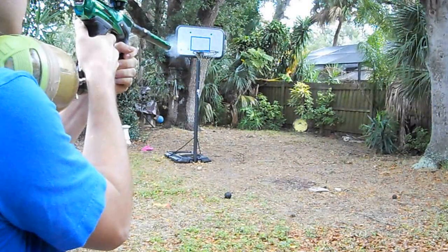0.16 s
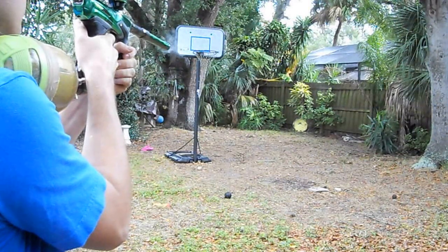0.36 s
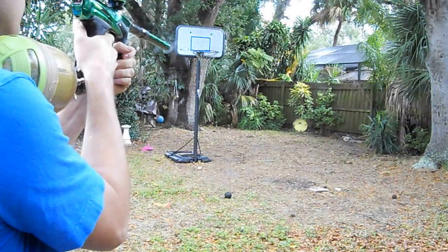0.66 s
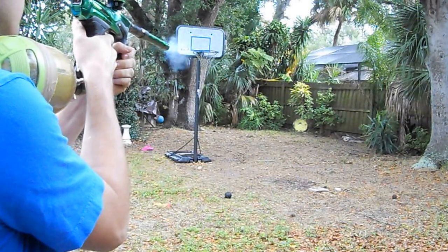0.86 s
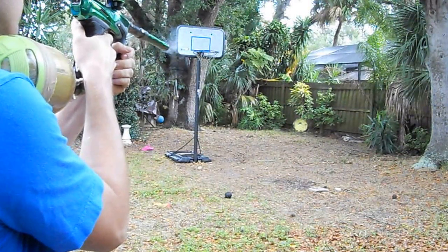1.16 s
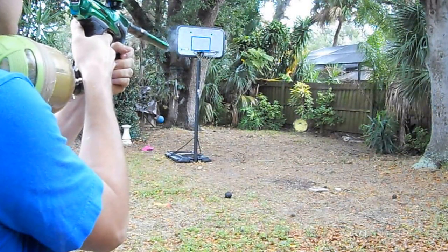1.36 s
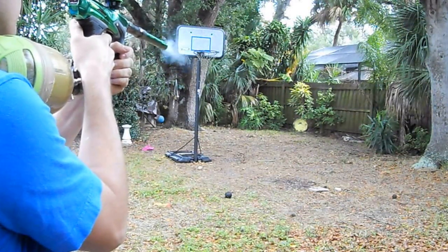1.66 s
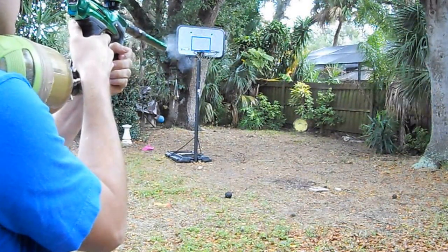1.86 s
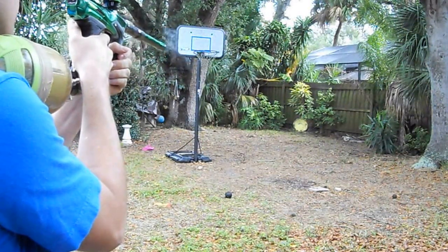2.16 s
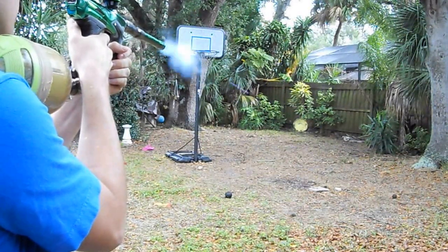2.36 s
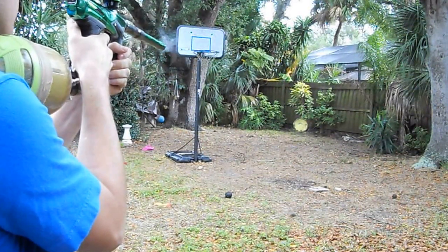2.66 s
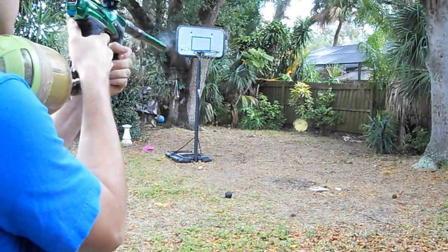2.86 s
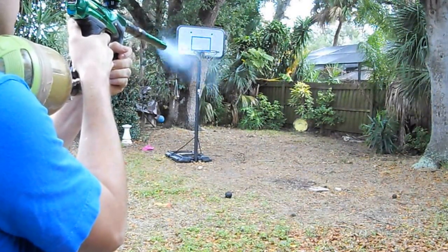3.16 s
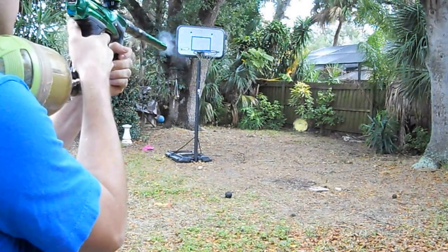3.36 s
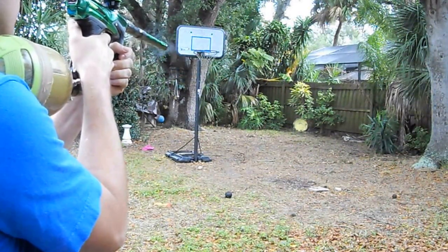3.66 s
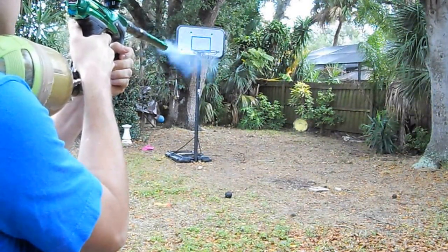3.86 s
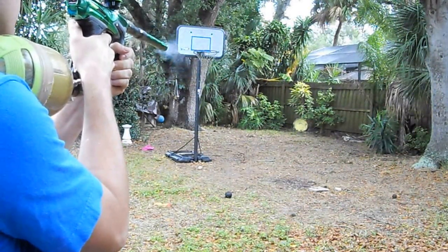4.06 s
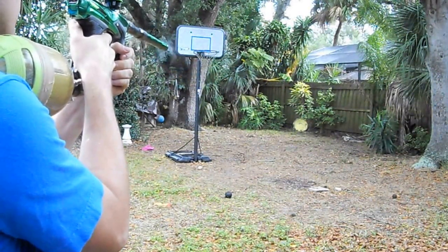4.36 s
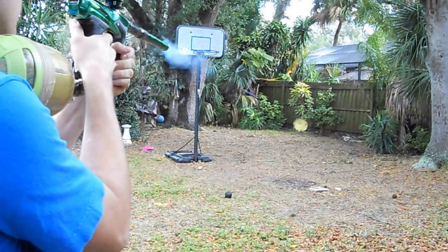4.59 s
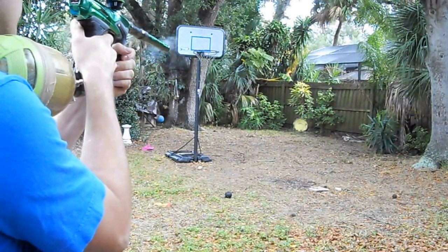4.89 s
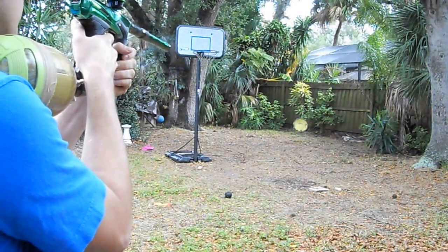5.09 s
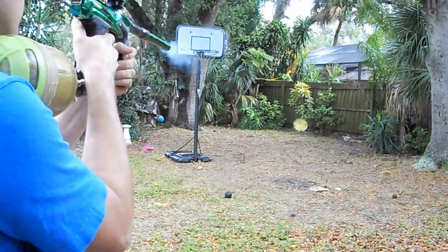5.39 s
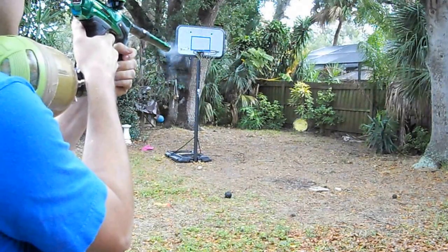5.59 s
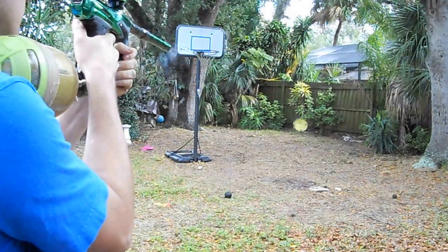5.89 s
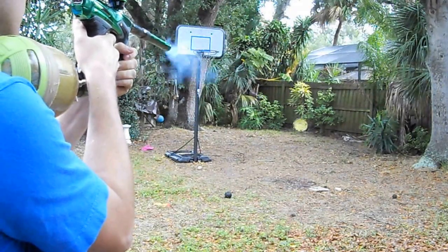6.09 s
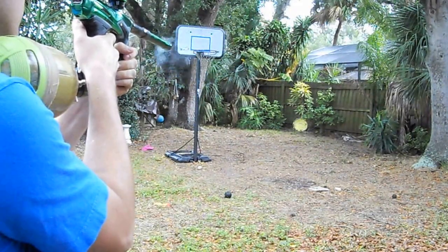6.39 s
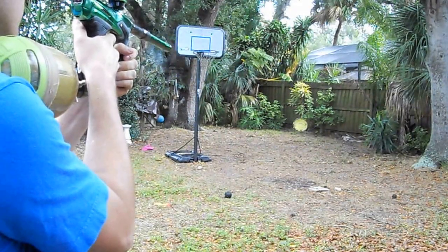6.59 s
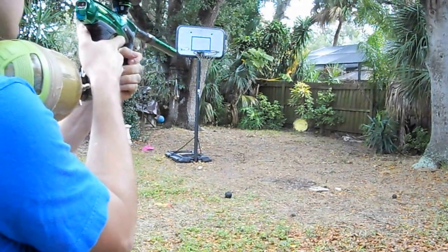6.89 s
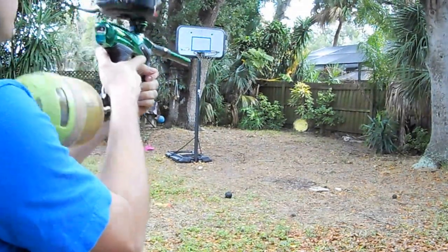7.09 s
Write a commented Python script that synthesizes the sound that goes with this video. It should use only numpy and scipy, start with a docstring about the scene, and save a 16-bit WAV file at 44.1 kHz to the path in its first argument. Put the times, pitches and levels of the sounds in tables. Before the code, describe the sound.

An outdoor yard sounds fairly loud until the first shot abruptly ducks the background. A nearby paintball marker then fires loud, slightly clipped pops, three spaced singles followed by fast doubles and a final triple. Mechanical clicks and gas bursts are close and dry; delayed splats and short dull metallic rings come from far off. Fence and trees scatter the echoes over soft leaf hiss and faint rumble.

```python
"""Paintball shots in a backyard

A paintball marker fires single shots and quick strings close by in a fenced yard, with leaves, far
traffic, a bird and dull knocks behind it. Clicks, squeals and thumps are sums of dying tones; gas and
scrapes are shaped noise. About 0.3 s after nearly every shot a ball bursts on a distant target that rings.
Fence, house, ground and trees throw sound back. A gain control keeps the yard loud until the first
shot pushes it down."""
import sys
import numpy as np
from scipy import signal
from scipy.fft import rfft, irfft
from scipy.io import wavfile
from scipy.ndimage import uniform_filter1d

SR = 44100
rng = np.random.default_rng(int(sys.argv[2]) if len(sys.argv) > 2 else 0)


def wav_record(signal):
    """Record a signal, one row per channel, as 16-bit PCM in the file named by sys.argv[1]."""
    frames = np.transpose(np.atleast_2d(signal))
    bounded = np.clip(frames, -1, 1)
    # unit amplitude maps onto the largest positive 16-bit level
    quanta = np.round(bounded * 32767).astype(np.int16)
    wavfile.write(sys.argv[1], SR, quanta)


N = 319380  # length of the scene in samples
T = np.arange(int(.45 * SR)) / SR  # the time axis of one short sound, in s


def amp(db):
    """Turns decibels into a gain."""
    return 10 ** (np.asarray(db) / 20)


def read(points, hz):
    """Reads a curve whose points are joined by straight lines on a log-frequency axis."""
    f, value = np.transpose(points)
    return np.interp(np.log(hz + 1), np.log(f + 1), value)


def add(mix, s, sound):
    """Mixes a sound in at time s."""
    part = mix[max(round(s * SR), 0):][:len(sound)]
    part += sound[:len(part)]


def cut(x, kind, hz, order):
    """A gentle high-pass or low-pass filter."""
    return signal.sosfilt(signal.butter(order, hz, kind, fs=SR, output="sos"), x)


def noise(colour, size):
    """Random noise shaped to a spectrum and brought to an rms of 1."""
    spectrum = rfft(rng.standard_normal(size))
    x = irfft(spectrum * amp(read(colour, np.fft.rfftfreq(size, 1 / SR))), size)
    return x / x.std()


def puff(colour, db, rise, t60):
    """A burst of noise that swells over about `rise` s and dies by 60 dB in `t60` s."""
    return noise(colour, len(T)) * amp(db - 60 * T / t60) * (1 - np.exp(-T / rise))


def ring(modes, rise):
    """A struck part rings with several dying tones of alternating sign, set off by one push."""
    swing = np.zeros(len(T))
    for k, (hz, db, t60) in enumerate(modes):
        swing += (-1) ** k * amp(db - 60 * T / t60) * np.sin(2 * np.pi * hz * T)
    return swing * (1 - np.exp(-T / rise))


# tone colours of the leaves and of the far traffic: [f/Hz, relative level/dB]
LEAVES = [(100, -13.5), (220, 0), (450, -1), (600, -1.5), (1140, -1), (1750, -8.5), (3800, -8), (6500, -13),
          (9700, -16), (11000, -26), (13000, -55.5)]
TRAFFIC = [(20, -8.5), (35, -3), (64, -6), (95, -6.5), (128, 1.5), (175, -15.5), (300, -15.5), (700, -51.5)]
# times when the background swells: [start t/s, hold t/s, leaves lift level/dB, traffic lift level/dB]
SWELLS = [(1.92, 0.055, 18, 4), (4.5, 0.28, 13, 5), (5.997, .22, 7, 8)]


def wash():
    """Leaves hiss over a rumble of far traffic; each swell rises, holds and sinks back."""
    rise_s, sink_s = 0.23, 0.23
    leaves_db, traffic_db = -60, -60  # resting levels
    t = np.arange(N) / SR
    for start, hold, leaves_lift, traffic_lift in SWELLS:
        rise = np.clip((t - start) / rise_s, 0, 1)
        sink = np.exp(-np.maximum(t - start - rise_s - hold, 0) / sink_s)
        leaves_db = leaves_db + leaves_lift * rise * sink
        traffic_db = traffic_db + traffic_lift * rise * sink
    return noise(LEAVES, N) * amp(leaves_db) + noise(TRAFFIC, N) * amp(traffic_db)


# faint falling bird whistles: [t/s, length t/s, start f/Hz, end f/Hz, level/dB]
WHISTLES = [(1.0, .13, 3420, 3380, -66), (2.52, .16, 3800, 3560, -64), (4.85, .16, 3860, 3700, -52.5),
            (7.17, .07, 4050, 3950, -65)]


def bird():
    """Thin whistles from the trees: one falling tone each, whose pitch wavers at random."""
    out = np.zeros(N)
    for s, length, start_hz, end_hz, db in WHISTLES:
        size = int(length * SR)
        waver = .1 * uniform_filter1d(rng.standard_normal(len(T)), size=200)[:size]
        pitch_hz = np.linspace(start_hz, end_hz, size) * (1 + waver)
        turns = np.cumsum(pitch_hz) / SR
        add(out, s, amp(db) * np.sin(2 * np.pi * turns) * signal.windows.tukey(size, .5))
    return out


# soft knocks in the yard: [t/s, relative level/dB]
YARD_KNOCKS = [(0.598, -44.5), (4.465, -43), (4.832, -41.5), (4.882, -48), (5.508, -53), (5.583, -54),
               (5.607, -50.5)]
# their dull colour: [f/Hz, relative level/dB]
DULL = [(200, -7), (600, 17), (1200, 10), (3000, -21)]


def knocks():
    """A few soft, dull knocks, each a short puff of low noise."""
    out = np.zeros(N)
    for s, db in YARD_KNOCKS:
        add(out, s, amp(db) * puff(DULL, db=7, rise=.004, t60=.1))
    return out


# single reflections from ground, house and fence: [delay t/s, level/dB]
WALLS = [(.0075, -10), (0.0237, -15), (0.0628, -22), (.076, -29), (0.0925, -22)]


def walls(x):
    """Ground, house and fence send back five delayed copies with little treble."""
    out = np.zeros(N)
    for delay, db in WALLS:
        add(out, delay, amp(db) * x)
    return cut(out, "lowpass", hz=2700, order=1)


# colour of the yard's echo: [f/Hz, level/dB]
YARD_COLOUR = [(60, 1.5), (300, 5.5), (600, -1.5), (1200, -2.5), (2100, 1.5), (3600, 4), (6400, -2.5),
               (10000, -1)]
# how long the echo takes to die by 60 dB: [f/Hz, t60 t/s]
YARD_T60 = [(100, 0.14), (500, 0.54), (1200, 0.54), (4000, 0.47), (7000, 0.52), (11000, 0.32)]


def yard(x, build, patchy_db):
    """Foliage scatters a sound into diffuse noise whose power builds up and dies band by band."""
    hz, t, z = signal.stft(x, SR, nperseg=256)
    # share the power among neighbouring bands
    octave = np.log2(hz + 100)
    near_bands = np.exp(-((octave[:, None] - octave) / .22) ** 2)
    power = near_bands / near_bands.sum(1, keepdims=True) @ abs(z) ** 2
    # spread the power over time
    t = t[t < 1]
    decay = (amp(-60 * t / read(YARD_T60, hz)[:, None]) * (1 - np.exp(-t / build))) ** 2
    decay /= decay.sum(1, keepdims=True)
    power = abs(signal.fftconvolve(power, decay, axes=1)[:, :z.shape[1]])
    # bushes and trunks answer in clumps
    clumps = uniform_filter1d(rng.standard_normal(z.shape), size=6, axis=0)
    clumps = uniform_filter1d(clumps, size=4, axis=1)
    colour_db = read(YARD_COLOUR, hz)[:, None] + patchy_db * clumps / clumps.std()
    scatter = signal.stft(rng.standard_normal(N), SR, nperseg=256)[2]
    scatter *= np.sqrt(power) / scatter.std() * amp(colour_db)
    return signal.istft(scatter, SR, nperseg=256)[1][:N]


# balls bursting: [t/s, force level/dB, target ring level/dB, scattered share level/dB]
HITS = [(0.7005, 2.5, -37, -2.5), (1.514, -1.5, -37, 2), (2.281, 15, -37.5, -8.5), (2.9738, 3.5, -49, -2),
        (3.093, -3.5, -48.5, 3.5), (3.8254, -7.5, -62, 1), (3.9265, -2.5, -47, -0.5),
        (4.5521, -2.5, -49, 2), (4.642, -5.5, -38.5, 5.5), (5.324, -2.5, -39, -1.5),
        (5.3996, -0.5, -38, -3), (6.073, 2.5, -39, 0.5), (6.1616, 7.5, -34.5, 0.5), (6.816, -6.5, -57, 1.5),
        (6.9027, -2, -41.5, 1), (6.9862, -4, -41, -3)]
# tones of the cracking shell: [f/Hz, level/dB, t60 t/s]
SHELL = [(2420, 8, 0.012), (2950, 15, 0.009), (3310, 10, 0.0064)]
# tones of the target, the first two beating against each other: [f/Hz, level/dB, t60 t/s]
TARGET = [(1246, 6, .25), (1265, 5, .22), (1250, -8, .5), (1612, -14, .1), (2105, -11, .1), (2490, -14, .1),
          (440, -6, .08)]
# colours of the splat, the crack, the knock and
# the target's note coming back from the trees: [f/Hz, relative level/dB]
SPLAT = [(2500, -18), (4300, 1), (6000, 2.5), (8500, -4.5), (11000, -15)]
CRACK = [(1400, -15.5), (2200, 2), (3000, 2), (3600, 5), (5000, -34.5)]
KNOCK = [(150, -31), (420, 0.5), (750, -4.5), (1100, 4.5), (1450, -2.5), (2200, -12.5)]
TARGET_ECHO = [(1120, -40), (1235, -2), (1265, 0), (1400, -35)]


def balls():
    """Each shell cracks with a sharp splat and rings the target; its spray spreads all round."""
    direct, spray = np.zeros(N), np.zeros(N)
    shell, target = ring(SHELL, rise=.0001), ring(TARGET, rise=0.0019)
    for s, force_db, ring_db, scatter_db in HITS:
        # with force the crack grows fastest and the knock slowest
        splat_db = -25.5 + force_db
        crack_db = -34.5 + 1.25 * force_db
        knock_db = -29.5 + 0.83 * force_db
        add(direct, s, amp(splat_db) * puff(SPLAT, db=14.0, rise=0.000086, t60=0.0047))
        add(direct, s, amp(crack_db) * shell)
        add(direct, s, amp(knock_db) * puff(KNOCK, db=9.0, rise=0.00025, t60=0.012))
        target_echo = puff(TARGET_ECHO, db=-9.5, rise=.012, t60=0.49)
        add(direct, s, amp(ring_db) * (target + target_echo))
        for colour, db in ((SPLAT, splat_db), (CRACK, crack_db), (KNOCK, knock_db)):
            add(spray, s, amp(db + scatter_db) * puff(colour, db=-1.0, rise=0.0011, t60=0.051))
    return direct, spray


BLAST_S = .002  # from the hammer blow to the blast, in s
# shots, played by muzzle() and marker(): [hammer blow t/s, thump level/dB, sear click level/dB]
SHOTS = [(0.4213, -0.9, 9), (1.2284, -0.5, 1.5), (1.9911, 1.5, 5), (2.6982, -0.5, 4), (2.8, 0.5, 2.5),
         (3.4575, -1.5, 1), (3.5386, -2.5, 1), (3.619, -1.2, 0.5), (4.2767, -6.5, -4), (4.3575, -5.5, -4.5),
         (5.0311, 0.3, 11.5), (5.1119, -3, -0.5), (5.791, -3.7, -1.5), (5.872, -3, -0.5),
         (6.5274, 1.5, 5.5), (6.6081, -0.8, 2.5), (6.6902, -2, 0.5)]
# colour of the blast: [f/Hz, relative level/dB]
MUZZLE = [(80, -6.5), (140, 8.5), (220, -14), (330, 1.5), (520, 5.5), (750, 6), (1200, 4.5), (1750, -10),
          (2400, -5), (4000, -7.5), (6500, -2.5), (10000, -14)]


def muzzle():
    """The blast of gas thrown forward into the yard, heard only as it comes back."""
    out = np.zeros(N)
    for s, thump_db, _ in SHOTS:
        add(out, s + BLAST_S, amp(thump_db) * puff(MUZZLE, db=-19.5, rise=0.00085, t60=0.055))
    return out


# tones of the marker's parts: [f/Hz, level/dB, t60 t/s]
SEAR = [(1080, -11, 0.0062), (1540, -11.5, 0.0023), (260, -19.5, 0.0036), (2050, -31, 0.015)]
HAMMER = [(2026, -9.5, 0.022), (2830, -8.5, 0.0043), (1280, -7, 0.0031), (3900, -0.5, 0.00092),
          (5500, -11, 0.0043), (6700, -19.5, 0.01)]
VALVE = [(6304, 4, 0.0043), (7200, -3.5, 0.0039), (9700, -9.5, 0.0063)]
BARREL = [(171, -14, 0.032), (108, -13.5, 0.03), (312, -13, 0.08), (367.6, -23.5, 0.073), (453, -20, 0.094),
          (549, -25, .06), (660, -31.5, 0.041), (831, -32, 0.044), (960, -23.5, 0.048), (1140, -37, 0.15)]
# colours of the mechanical snaps, the gas and the thin refill hiss: [f/Hz, relative level/dB]
SNAP = [(300, -6), (1500, -9), (2800, -9), (5200, 2.5), (7000, -7), (9000, -2.5), (11000, -19)]
GAS = [(60, -12), (130, -1), (230, -8.5), (330, -5.5), (1000, 3), (1800, -5.5), (2300, -5.5), (4000, -5.5),
       (6500, -6), (9500, -8.5), (11000, -18.5)]
REFILL = [(8500, -19.5), (9500, 2), (10100, -2), (10800, -24)]


def marker():
    """Parts ring and gas hisses in each shot, with its own thump and click strength and fresh noise."""
    # times in s, counted from the hammer blow
    trigger_s, sear_s, scrape_s = -.0162, -.0129, -.012
    bounce_s, valve_s, bolt_s = .0018, .0039, .0271
    out = np.zeros(N)
    sear, hammer = -ring(SEAR, rise=.0001), -ring(HAMMER, rise=.0001)
    valve, barrel = ring(VALVE, rise=.0005), ring(BARREL, rise=0.0015)
    for s, thump_db, sear_db in SHOTS:
        # the trigger ticks, then the sear lets the hammer go, which scrapes forward
        add(out, s + trigger_s, puff(SNAP, db=-37.5, rise=0.00075, t60=0.0057))
        add(out, s + sear_s, amp(sear_db) * sear)
        add(out, s + scrape_s, amp(sear_db) * puff(SNAP, db=-24, rise=0.0001, t60=0.031))
        # the hammer strikes the valve and bounces once
        blow = hammer + puff(SNAP, db=-13.0, rise=.0001, t60=0.017)
        add(out, s, amp(thump_db / 2) * blow)
        add(out, s + bounce_s, amp(thump_db - 7) * hammer)
        # the barrel's hollow note changes less from shot to shot than the hiss
        add(out, s + BLAST_S, amp(.3 * thump_db) * barrel)
        # gas squeals through the valve, a little louder in a stronger shot, and hisses
        add(out, s + valve_s, amp(1.3 + 0.23 * thump_db) * valve)
        add(out, s + valve_s, amp(thump_db) * puff(GAS, db=-16.5, rise=0.00026, t60=0.083))
        # the bolt slams back and is caught, and fresh gas refills the valve
        add(out, s + bolt_s, amp(thump_db) * puff(SNAP, db=-11.0, rise=0.00012, t60=0.0063))
        add(out, s + bolt_s, puff(REFILL, db=-48, rise=.01, t60=0.5))
    return out


def scene():
    """Adds the near marker, the far target, their echoes and the background."""
    # so small a muzzle sends out little deep bass
    near, blast = cut([marker(), muzzle()], "highpass", hz=58, order=2)
    far, spray = balls()
    blast_echo = amp(0.5) * yard(blast, build=0.027, patchy_db=1.5)
    hit_echo = amp(-1) * yard(spray, build=0.0039, patchy_db=1.5)
    reflections = walls(far + amp(-9.5) * near + amp(7.0) * blast)
    background = knocks() + bird() + wash()
    return (near + far + spray + blast_echo + hit_echo + reflections + background)[None]


def record(dry):
    """Gain control falls within milliseconds at the first shot and stays down; the loudest peaks clip."""
    # follow the loudness over a few milliseconds
    keep = np.exp(-1 / (0.0049 * SR))
    level_db = 10 * np.log10(signal.lfilter([1 - keep], [1, -keep], dry[0] ** 2) + 1e-12)
    # hold each peak of the loudness, letting the held value sink by 1.2 dB a second
    sink_db = 1.2 * np.arange(N) / SR
    held_db = np.maximum.accumulate(level_db + sink_db) - sink_db
    # the held value stays so high after the first shot that the cut remains at its limit
    full_gain_db, threshold_db = 26, -46
    cut_db = np.clip(held_db - threshold_db, 0, full_gain_db)
    lag = np.exp(-1 / (0.0013 * SR))
    x = dry * amp(full_gain_db - signal.lfilter([1 - lag], [1, -lag], cut_db))
    # the preamplifier rounds off overload
    x = x / (1 + (x / 1.05) ** 4) ** (1 / 4)
    # the band is limited, then the converter clips the last peaks and limits the band again
    mic_filter = signal.firwin(129, 10900, window=("kaiser", 7), fs=SR)
    x = signal.oaconvolve(x, mic_filter[None], "same")
    edge_filter = signal.firwin(255, 15600, window=("kaiser", 9), fs=SR)
    return signal.oaconvolve(np.clip(x, -1, 1), edge_filter[None], "same")


dry = scene()
out = record(dry)
wav_record(out)
```